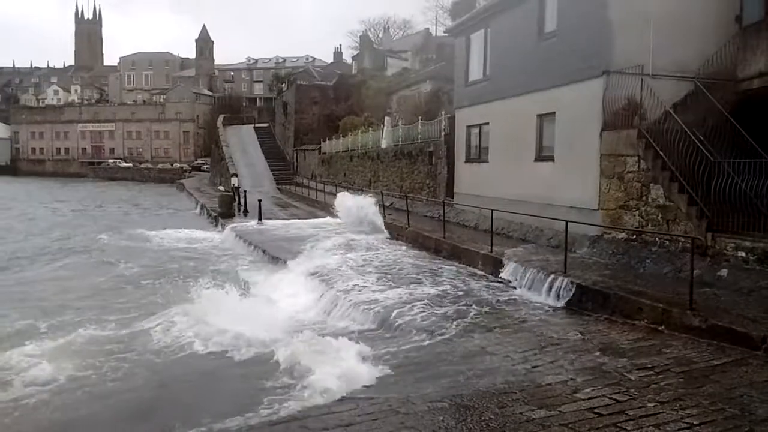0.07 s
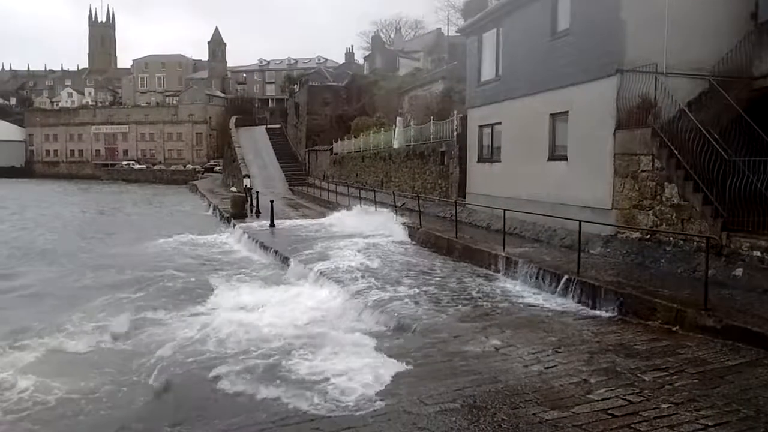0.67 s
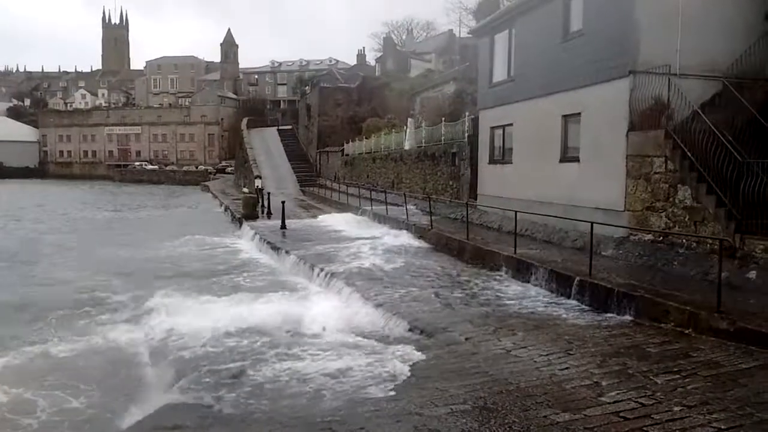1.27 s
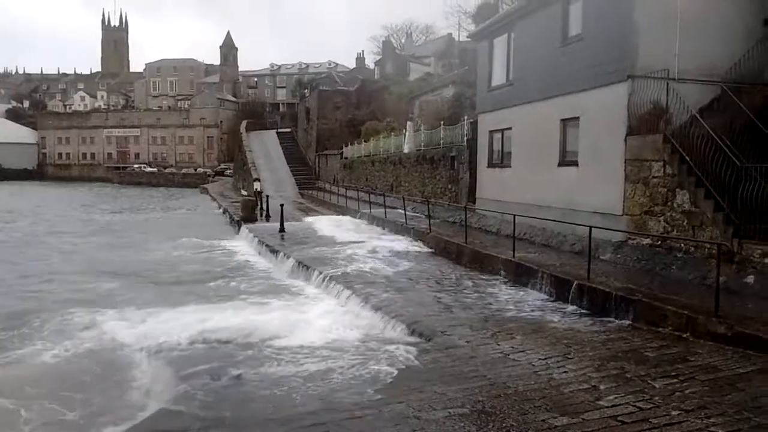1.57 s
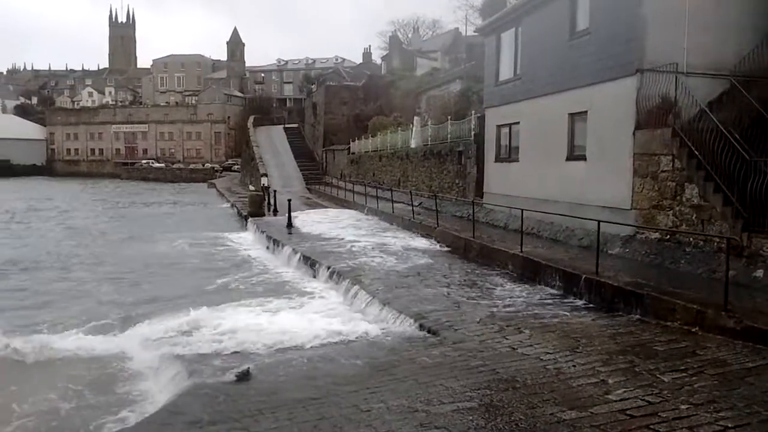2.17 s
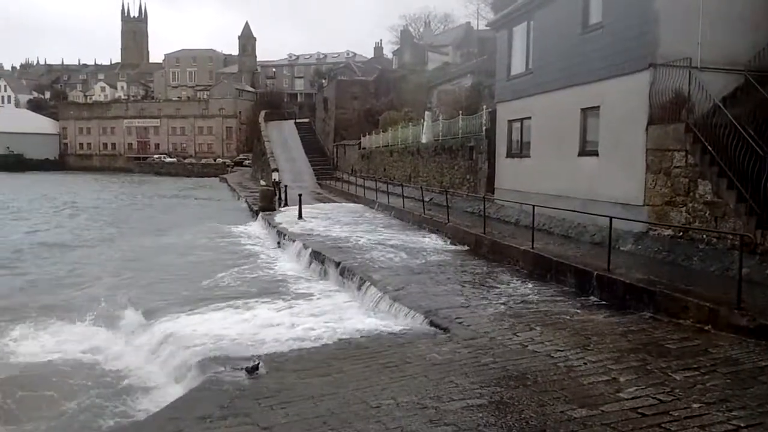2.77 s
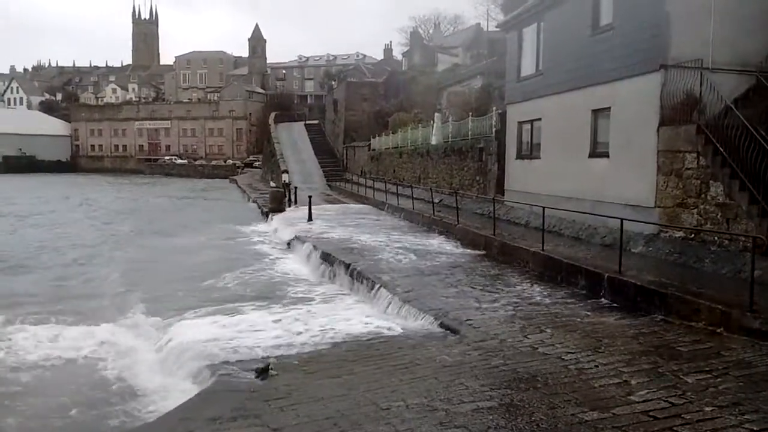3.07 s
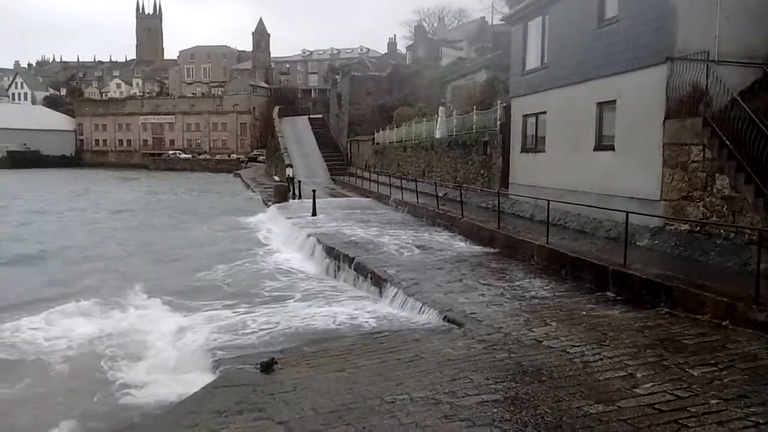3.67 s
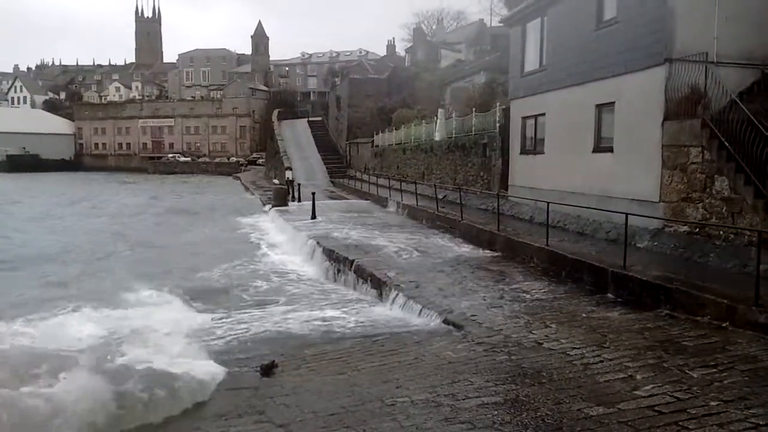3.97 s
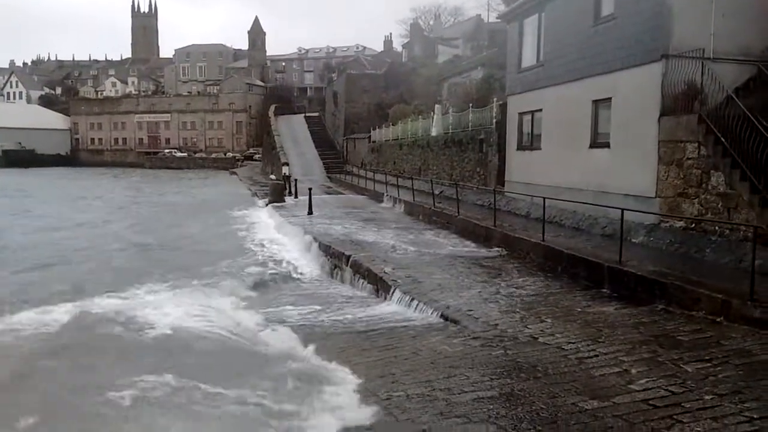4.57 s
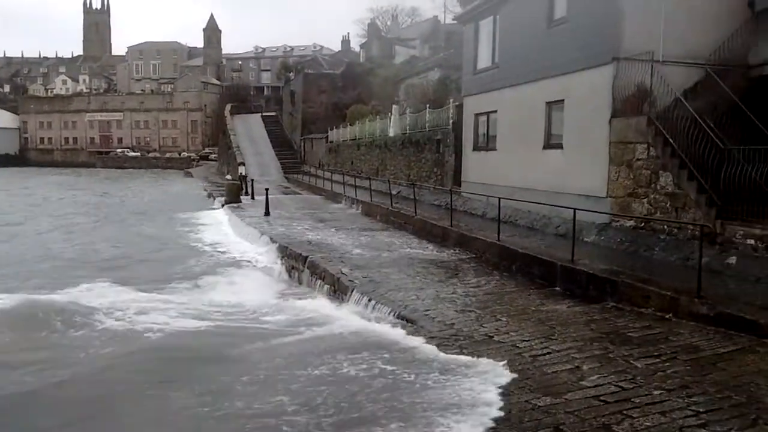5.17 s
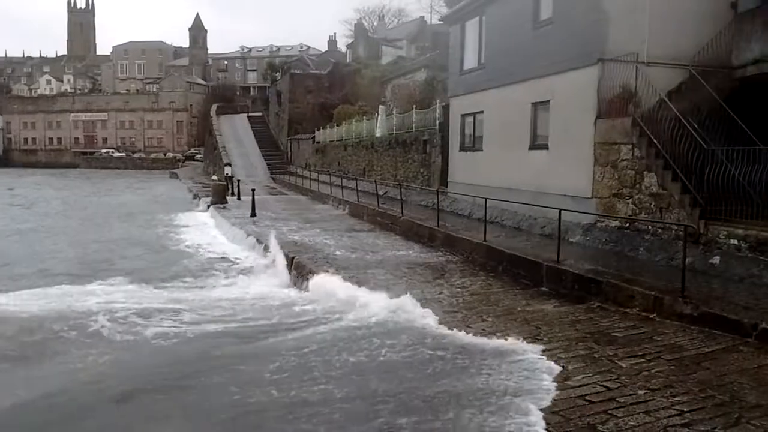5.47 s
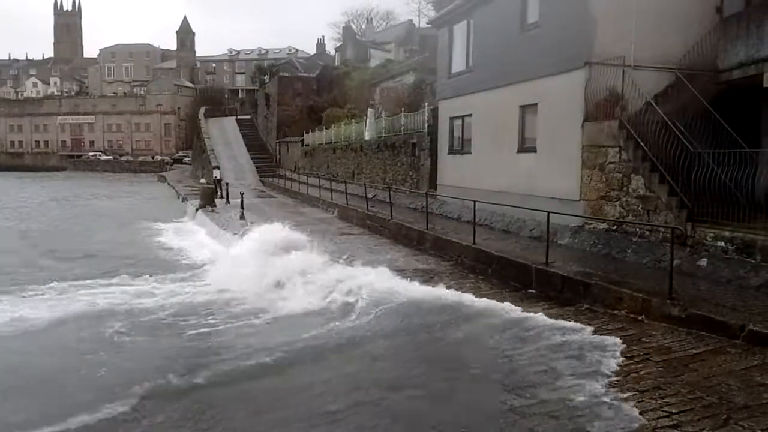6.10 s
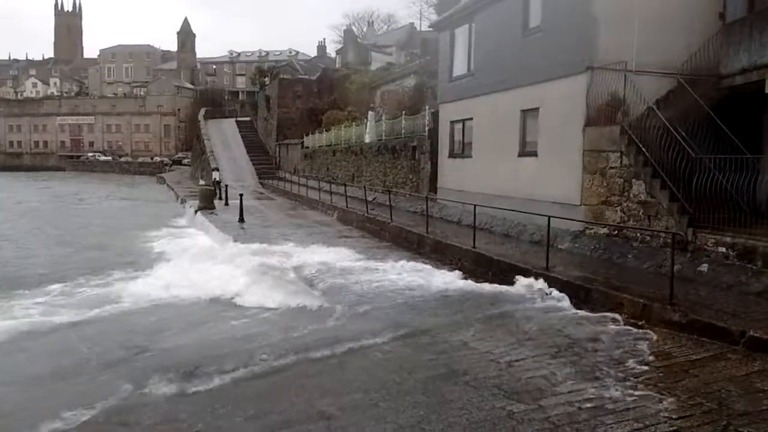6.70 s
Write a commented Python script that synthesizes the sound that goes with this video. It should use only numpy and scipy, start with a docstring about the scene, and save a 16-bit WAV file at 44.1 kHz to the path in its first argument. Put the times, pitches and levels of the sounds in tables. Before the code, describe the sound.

Rough waves wash over a stone slipway while gusty wind rumbles and thumps on the microphone throughout, wide in stereo and louder than the water. A strong gust opens, easing by about 0.5 seconds, and the buffeting returns from 1 second. The churning, bubbly wash and its fizzing foam build to a swell around 2 seconds. Water slaps the stone in short bursts between 2.2 and 3.2 seconds. The wash peaks again near 3.5 seconds, then dips under hard wind thumps. Just after 4 seconds, two small drops tick close by with a brief patter of spray. More slaps come around 4.7 seconds and a strong gust at 5. From about 5.4 seconds a last wave rushes up close, slapping near 5.8 and 6 seconds, and keeps washing under more gusts until the end at about 7 seconds. The open sea hisses faintly behind everything.

```python
"""Rough waves surge over a stone slipway below a seawall, with churning bubbles and fizzing foam.
Water slaps the stone and throws spray and drops, while the open sea hisses faintly behind.
Gusty wind rumbles and thumps on two close microphone ports (openings), pushing them opposite ways.
Their spacing carves broad peaks and dips, different in their sum (mid) and difference (side)."""
import sys
import numpy as np
from scipy import signal
from scipy.fft import rfft, irfft, next_fast_len
from scipy.io import wavfile
from scipy.ndimage import uniform_filter1d, map_coordinates

SR = 44100
rng = np.random.default_rng(int(sys.argv[2]) if len(sys.argv) > 2 else 0)


def inscribe(sig):
    """Save sig as 16-bit PCM at rate SR to the path in sys.argv[1].

    A 1-D sig is mono; a 2-D sig holds one channel per row.
    Samples are clipped to [-1, 1] before scaling.
    """
    pcm = np.round(np.clip(np.atleast_2d(sig).T, -1, 1) * 32767)
    wavfile.write(sys.argv[1], SR, pcm.astype(np.int16))


N = 306054


def amp(db):
    """Turn decibels into a gain."""
    return 10 ** (np.asarray(db) / 20)


def unit(x):
    """Scale to an average size (rms) of 1."""
    return x / np.sqrt(np.mean(x ** 2) + 1e-20)


def along(points, hz):
    """Read a table of (frequency, value) points on a log frequency axis."""
    freqs, values = np.transpose(points)
    return np.interp(np.log(hz + 1), np.log(freqs + 1), values)


def curves(rows):
    """Join timed rows with straight lines: one curve for each column after the time."""
    times, *columns = np.transpose(rows)
    return [np.interp(np.arange(N) / SR, times, column) for column in columns]


def wobble(rate):
    """A smooth random curve of rms 1, through `rate` random points a second."""
    knots = rng.standard_normal(4096)
    return unit(map_coordinates(knots, [np.arange(N) * rate / SR], mode="wrap"))


def filtered(x, response):
    """Give each frequency in x the gain response(hz)."""
    size = next_fast_len(N + 8192)
    return irfft(rfft(x, size) * response(np.fft.rfftfreq(size, 1 / SR)), size)[..., :N]


def below(hz, corner_hz, order=4):
    """Gain that keeps the lows."""
    return 1 / np.sqrt(1 + (hz / corner_hz) ** (2 * order))


def above(hz, corner_hz, order=4):
    """Gain that keeps the highs."""
    return (hz / corner_hz) ** order * below(hz, corner_hz, order=order)


def ports(pair, mid, side):
    """Give mid and side each its own tone colour."""
    return filtered(pair, lambda hz: amp([along(mid, hz), along(side, hz)]))


def white():
    """White noise for mid and side."""
    return rng.standard_normal((2, N))


def kicks(rate, spread_db):
    """Random clicks of either sign and uneven size, about `rate` a second."""
    hit = rng.random(N) < rate / SR
    strength = amp(spread_db * rng.uniform(-1.23, 1, N))
    return unit(hit * strength * rng.choice([-1, 1], N))


def patchy(x, depth_db):
    """Make random patches louder or softer, each a few hundred Hz wide and some 60 ms long."""
    spectrum = signal.stft(x, nperseg=512)[2]
    patches = uniform_filter1d(rng.standard_normal(spectrum.shape[1:]), size=6, axis=0)
    patches = uniform_filter1d(patches, size=10, axis=1)
    return signal.istft(spectrum * amp(depth_db * unit(patches)), nperseg=512)[1][:, :N]


def bubbles(low_hz, high_hz, cycles, spread_db, count, samples):
    """A cloud of bubbles: each rings briefly, rising in pitch as it fades."""
    when, pitch, loudness, angle = rng.random((count, 4)).T[..., None]
    age = np.arange(samples)
    pitch_ratio = (high_hz / low_hz) ** pitch
    turns = low_hz * pitch_ratio * age / SR
    life = turns / cycles
    strength = amp(-spread_db * np.log(np.maximum(loudness, .01))) * pitch_ratio
    glide = 1 + 0.041 * np.minimum(life, 2)
    ring = strength * np.exp(-2 * life) * np.sin(2 * np.pi * turns * glide)
    at = ((when * N).astype(int) + age).ravel()
    mid_side = np.cos(2 * np.pi * angle), np.sin(2 * np.pi * angle)
    return unit(np.array([np.bincount(at, (ring * share).ravel(), N)[:N] for share in mid_side]))


# Level of the wash and foam as heard, ducking briefly after strong wind thumps:
# t/s, wash level/dB, foam level/dB
SURF_LEVELS = [(0, -42.5, -47.5), (.2, -51.5, -56.5), (.45, -48.5, -53.5), (.67, -45.5, -51),
               (1.25, -41, -44), (1.52, -39, -44.5), (1.8, -36.5, -42.5), (2.37, -36, -41.5),
               (2.52, -41, -46.5), (2.8, -42.5, -47.5), (3.47, -35, -43), (3.53, -45.5, -52.5),
               (3.73, -42, -49.5), (3.82, -48.5, -55), (3.98, -43.5, -53.5), (4.22, -37, -43),
               (4.42, -41, -44), (4.58, -38.5, -42.5), (4.79, -36.5, -41.5), (4.83, -40.5, -46.5),
               (5, -38.5, -45.5), (5.15, -40, -49), (5.32, -40, -49), (5.47, -37, -43), (5.6, -39, -47),
               (6.08, -35.5, -41), (6.3, -38, -43), (6.58, -37.5, -40.5), (6.67, -38, -44),
               (6.93, -39, -47)]
# Tone colour of the water, mid and side: f/Hz, level/dB
WATER_MID = [(300, -22), (850, 0), (1250, 1.5), (1620, 3), (2500, -4), (3200, -16.5), (4000, -12),
             (4650, -6.5), (5500, -20.5), (6400, -28.5), (7700, -14.5), (9300, -23), (12800, -27),
             (15500, -33.5)]
WATER_SIDE = [(250, 16.5), (750, 7), (1150, -1), (1600, -9), (2300, -0.5), (3900, -9), (4450, -16.5),
              (4800, -27), (5400, -23.5), (7100, -18), (8200, -23.5), (9400, -19.5), (12600, -31),
              (14000, -27.5)]
# The last wave runs up close and its sound narrows: t/s, share of the rush colour/0-1
LAST_WAVE = [(4.7, 0), (5.4, 0.55), (6, .85), (6.5, 1), (6.93, 0.7)]
# Colour of that close rush, added to the wash: f/Hz, level/dB
RUSH_COLOUR = [(300, -1), (600, -1), (1150, -2.5), (1500, 2.5), (1750, 0.5), (2100, 0), (3100, -2.5)]


def surf():
    """Breaking water churns with bubbles; the foam it leaves fizzes on the stone."""
    wash_db, foam_db = curves(SURF_LEVELS)
    churn_db = 0.35 * wobble(7.7) + 0.3 * wobble(30)
    split_hz = 3100  # wash below, foam above
    body = white() + amp(-16.5) * bubbles(502, 3460, cycles=5.4, spread_db=-0.5, count=7000, samples=400)
    body = ports(patchy(body, depth_db=0.82), WATER_MID, WATER_SIDE)
    body = filtered(body, lambda hz: below(hz, split_hz) * above(hz, 260, order=2))
    close = np.clip(curves(LAST_WAVE)[0], 0, 1)
    body = (1 - close) * body + close * filtered(body, lambda hz: amp(along(RUSH_COLOUR, hz)))
    fizz = white() + amp(-7) * bubbles(2850, 14000, cycles=1.9, spread_db=2, count=20000, samples=64)
    fizz = ports(patchy(fizz, depth_db=0.7), WATER_MID, WATER_SIDE)
    fizz = filtered(fizz, lambda hz: above(hz, split_hz))
    wash = body / body[0].std() * amp(wash_db + churn_db)
    foam = fizz / fizz[0].std() * amp(foam_db + 0.82 + 1.95 * churn_db + 0.089 * wobble(66))
    return wash + foam


def far_sea():
    """Open water hisses faintly and evenly behind the near waves."""
    hiss = filtered(ports(white(), WATER_MID, WATER_SIDE), lambda hz: above(hz, 4100, order=2))
    return amp(-58.5) * unit(hiss)


# Gusts: arrival t/s, level/dB, hold/s, head-on push/dB compared with that level
WIND_GUSTS = [(0, -15.5, .2, 3), (0.312, -27, 0.081, 3), (1.013, -19.5, 0.16, 3), (1.248, -21, 0.15, 0.5),
              (1.528, -28, 0.026, -5), (1.658, -24.5, 0.19, -3.5), (2.038, -18, 0.039, -1),
              (2.328, -20, 0.03, -7), (2.433, -17.5, 0.079, 0), (2.622, -25.5, 0.049, -1),
              (2.738, -20, 0.12, -0.5), (3.158, -22.5, 0.055, -2), (3.44, -22.5, 0.33, 4),
              (3.73, -19.5, 0.12, 3), (4.17, -21, 0.024, 5.5), (4.363, -21, 0.081, 0.5),
              (4.755, -24.5, 0.22, -1), (5.013, -15, 0.11, -1), (5.155, -24, 0.064, 3.5),
              (5.37, -23, 0.2, -7.5), (5.676, -23, 0.19, -3), (6.099, -24.5, 0.33, -1),
              (6.798, -21, 0.021, 3), (6.906, -16.5, 0.04, 3)]
# The breeze between gusts: t/s, level/dB
BREEZE_LEVELS = [(0, -25.5), (.72, -33.5), (.86, -37.5), (1.1, -29), (3.4, -26), (3.97, -33.5),
                 (4.25, -28.5), (4.6, -30), (5.6, -34), (6.05, -20.5), (6.47, -43.5), (6.65, -25),
                 (6.93, -46)]


def wind_strength():
    """Gusts rise, hold and die away over the breeze; gives the flow and its head-on push in dB."""
    rise_s, fall_s = 0.018, 0.021
    t = np.arange(N) / SR
    power = amp(curves(BREEZE_LEVELS)[0]) ** 2
    for start, db, hold, head_on_db in WIND_GUSTS:
        fade = np.maximum(start - t, 0) / rise_s + np.maximum(t - start - hold, 0) / fall_s
        power = power + (amp([[db], [db + head_on_db]]) * np.exp(-fade)) ** 2
    return 10 * np.log10(power)


def turbulence(rate, smooth_db):
    """Small swirls of air kick the two ports unevenly, over a smooth random flow."""
    kick = kicks(rate, spread_db=5.5)
    uneven = rng.choice([-1, 1], N) * rng.uniform(0.77, 1.09, N)
    return np.array([kick * uneven, kick]) + amp(smooth_db) * white()


# Tone colours of the wind's low rumble and rough rasp, mid and side: f/Hz, level/dB
RUMBLE_MID = [(15, -27), (45, -13.5), (95, -9), (150, -9), (230, -15), (350, -26.5), (550, -33.5),
              (1000, -78), (2500, -83), (6000, -100)]
RUMBLE_SIDE = [(15, -8), (45, -1.5), (95, 6), (150, 5.5), (230, -2.5), (350, -15.5), (550, -26),
               (1000, -39), (2500, -56), (6000, -100)]
RASP_MID = [(100, -13), (300, 5.5), (550, -2), (900, -12), (1500, -17.5), (2600, -43), (8000, -65)]
RASP_SIDE = [(100, -11), (300, 14.5), (550, -4), (900, -12), (1500, -36), (2600, -31), (8000, -62)]


def wind():
    """Swirling air rumbles in lumps, and rasps where it hits the ports head-on."""
    deep_growth, rasp_growth = 0.75, 1.393  # dB per dB of wind: bass grows slowest, rasp fastest
    flow_db, push_db = wind_strength() + 1.3 * wobble(26) + 2.44 * wobble(70)
    rumble = ports(turbulence(rate=260, smooth_db=0), RUMBLE_MID, RUMBLE_SIDE)
    rumble /= rumble[1].std()
    deep = filtered(rumble, lambda hz: below(hz, corner_hz=71.6) ** 2)
    rasp = ports(turbulence(rate=450, smooth_db=-4.5), RASP_MID, RASP_SIDE)
    rasp /= rasp[0].std()
    flutter_db = 1.5 * wobble(90)
    return (deep * amp(deep_growth * flow_db - 4)
            + (rumble - deep) * amp(flow_db + 1)
            + rasp * amp(rasp_growth * push_db - 15 + flutter_db))


def puff(pair, span, swell):
    """Shape a piece of mid and side with a swell, each at about rms 1 on the crest."""
    piece = pair[:, span] * swell
    return piece / np.linalg.norm(piece, axis=1, keepdims=True) * np.linalg.norm(swell)


# The hardest swirls of air: t/s, level/dB, rasp/dB added to that level
HARD_SWIRLS = [(.028, -13.5, -16.5), (0.068, -17, -23), (.089, -9, -15), (0.109, -15, -24),
               (0.139, -12, -7), (.201, -27, -10), (.213, -19, -10), (0.227, -19.5, -12), (.297, -26, -8.5),
               (0.336, -22, -33), (.568, -14, -29), (.742, -32, -32), (.945, -22, -30), (1.012, -22.5, -25),
               (1.063, -15.5, -24), (1.077, -11.5, -23), (1.128, -16, -15), (1.163, -8, -37),
               (1.19, -14, -31), (1.245, -9.5, -27), (1.268, -13.5, -20), (1.285, -14, -30),
               (1.3, -11, -33), (1.33, -23, -29), (1.396, -9.5, -22), (1.451, -17, -33), (1.53, -16, -32),
               (1.566, -19.5, -35), (1.649, -16, -33), (1.698, -20, -29), (1.736, -12.5, -26),
               (1.837, -19.5, -32), (2.055, -13.5, -5.5), (2.075, -14, -31), (2.429, -14.5, -21),
               (2.476, -13, -29), (2.517, -10.5, -25), (2.645, -15.5, -23), (2.731, -9, -20.5),
               (2.788, -9, -32), (2.835, -15, -30), (2.915, -10, -38), (3.152, -18, -28), (3.188, -16, -28),
               (3.482, -7, -18), (3.537, -13.5, -21), (3.559, -14, -14), (3.693, -14, -28),
               (3.733, -16, -25), (3.752, -13, -30), (3.762, -10.5, -23), (3.803, -14, -16),
               (3.825, -13.5, -33), (3.853, -19, -21), (4.106, -21, -20), (4.361, -17, -21),
               (4.384, -11, -26), (4.409, -16, -28), (4.473, -16.5, -32), (4.76, -16.5, -18),
               (4.804, -8, -34), (4.872, -17, -34), (5.024, -9, -26), (5.058, -12, -13.5),
               (5.075, -13.5, -21), (5.101, -23, -24), (5.491, -10.5, -32), (5.53, -13, -42),
               (5.686, -7, -16.5), (5.788, -20, -21), (6.117, -14, -28), (6.192, -9.5, -19),
               (6.266, -15.5, -32), (6.319, -14, -14.5), (6.342, -12.5, -15), (6.584, -15, -17),
               (6.797, -12, -21), (6.813, -16.5, -23), (6.896, -17, -25)]
# Tone colour of the rasp at a thump's crest, mid and side: f/Hz, level/dB
CREST_MID = [(100, -13), (300, 2), (550, -7), (1200, -13), (1850, -22), (3000, -48), (8000, -62)]
CREST_SIDE = [(100, -2), (300, 9.5), (550, 4), (900, -10), (1500, -27), (2600, -21), (8000, -60)]


def wind_thumps():
    """A hard swirl gives one sudden kick and a short wake: a low thump with a rasp at its crest."""
    rise_s, wake_s = 0.0046, 0.011
    lowest_hz = 117  # one swirl is too small to push much deeper
    shared_db = -12.5  # the part of a thump that both ports share
    push = white()
    for time, _, _ in HARD_SWIRLS:
        push[:, round(time * SR)] += amp(26.5) * rng.choice([-1, 1], size=2)
    rumble = filtered(ports(push, RUMBLE_MID, RUMBLE_SIDE), lambda hz: above(hz, lowest_hz, order=2))
    rasp = ports(push + white(), CREST_MID, CREST_SIDE)
    out = np.zeros((2, N))
    for time, db, rasp_db in HARD_SWIRLS:
        centre = round(time * SR)
        span = np.arange(max(centre - SR // 10, 0), min(centre + SR // 10, N))
        age = span / SR - time
        swell = np.exp(-(age / np.where(age < 0, rise_s, wake_s)) ** 2)
        thump = puff(rumble, span, swell) * amp([[shared_db], [0]])
        crest = puff(rasp, span, swell ** 1.87) * amp([[rasp_db + 0.5], [rasp_db + 3]])
        out[:, span] += amp(db - 1.9) * (thump + crest)
    return out


def patter():
    """Many small drops land in a bright crackle."""
    grains = white() + np.array([kicks(rate=2300, spread_db=16), kicks(rate=2300, spread_db=-4)])
    return unit(filtered(ports(grains, WATER_MID, WATER_SIDE), lambda hz: above(hz, 3150, order=3)))


# Water hitting stone: t/s, level/dB, time to fade by 60 decibels/s
WATER_SLAPS = [(2.213, -20.5, 0.23), (2.335, -18.5, 0.44), (2.572, -21.5, 1), (3.069, -24, 0.14),
               (3.14, -23.5, 0.33), (3.224, -16.5, 0.097), (4.636, -22, 0.18), (4.756, -23, 0.18),
               (5.811, -17.5, 0.28), (6.045, -26, 0.69)]
# Tone colour of a slap, mid and side: f/Hz, level/dB
SLAP_MID = [(100, -26), (300, 2), (520, 8), (900, 3), (1500, -2), (2600, -12), (6000, -63)]
SLAP_SIDE = [(100, -10), (300, 14.5), (520, 13), (900, 0), (1500, -10), (2600, -36), (6000, -57)]


def slaps():
    """Water slaps the stone in a ragged burst, with crackling spray above it."""
    lead_s, rise_s = 0.006, 0.0034
    t = np.arange(N) / SR
    loudness = np.zeros(N)
    for time, db, fade_s in WATER_SLAPS:
        age = np.maximum(t - time + lead_s, 0)
        loudness += amp(db - 60 * age / fade_s) * (1 - np.exp(-age / rise_s))
    body = unit(ports(white(), SLAP_MID, SLAP_SIDE)) * amp(2.96 * wobble(130))
    return loudness * (amp(-7) * body + amp(-30.5) * patter())


# Single drops landing: t/s, level/dB
NEAR_DROPS = [(4.059, -31.5), (4.112, -26)]
# The tones a drop rings with: f/Hz, level/dB
DROP_TONES = [(5100, 3), (7900, -17), (10200, -6), (12900, -7)]


def drops():
    """Flying drops land close by, each with a tick and a tiny ring."""
    ring_s, tick_s = 0.011, 0.0041  # time to fade by 60 dB
    t = np.arange(SR // 50) / SR
    ring = sum(amp(db - 60 * t / ring_s) * np.sin(2 * np.pi * hz * t) for hz, db in DROP_TONES)
    out = np.zeros(N)
    for time, db in NEAR_DROPS:
        tick = 0.5 * amp(-60 * t / tick_s) * rng.standard_normal(len(t))
        out[round(time * SR):][:len(t)] += amp(db - 3.5) * (ring + tick)
    return out * np.array([[1], [0.4]])  # mid and side: toward the left


# Showers of flung spray: middle t/s, level/dB
SHOWERS = [(4.129, -37), (4.21, -34)]


def spray():
    """Flung spray patters close by in short showers that swell and stop."""
    half_length_s = 0.025
    t = np.arange(N) / SR
    return patter() * sum(amp(db) * np.exp(-((t - time) / half_length_s) ** 2) for time, db in SHOWERS)


def left_right(pair):
    """Turn mid and side into left and right."""
    mid, side = pair
    return np.array([mid + side, mid - side])


# How the water sound leans to one side: f/Hz, left minus right level/dB
WATER_LEAN = [(600, -.5), (1300, -0.3), (2200, 2.5), (3100, 2.5), (4000, 0.5), (5000, -1), (5800, 3),
              (7400, -4), (8700, 0), (11000, 0.7), (15000, 0.5)]


def scene():
    """Water and wind together, in left and right."""
    water = left_right(surf() + slaps() + spray() + drops() + far_sea())
    water = filtered(water, lambda hz: amp(np.outer([0.5, -0.5], along(WATER_LEAN, hz))))
    air = left_right(wind() + wind_thumps())
    sway_db = 1.17 * wobble(25)  # swirls favour now one port, now the other
    return water + air * amp(np.outer([0.5, -0.5], sway_db))


def record(dry):
    """Round off the strongest thumps at full scale and cut the highest treble."""
    top_hz = 15500
    rounded = dry / (1 + np.abs(dry) ** 6) ** (1 / 6)
    return filtered(rounded, lambda hz: hz < top_hz)


dry = scene()
out = record(dry)
inscribe(out)
```